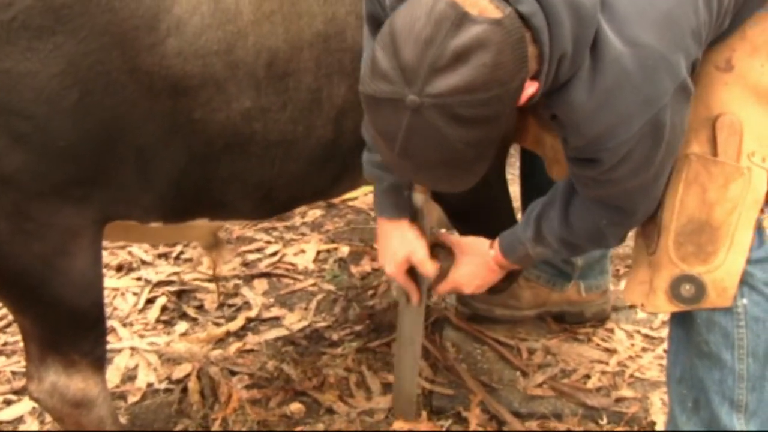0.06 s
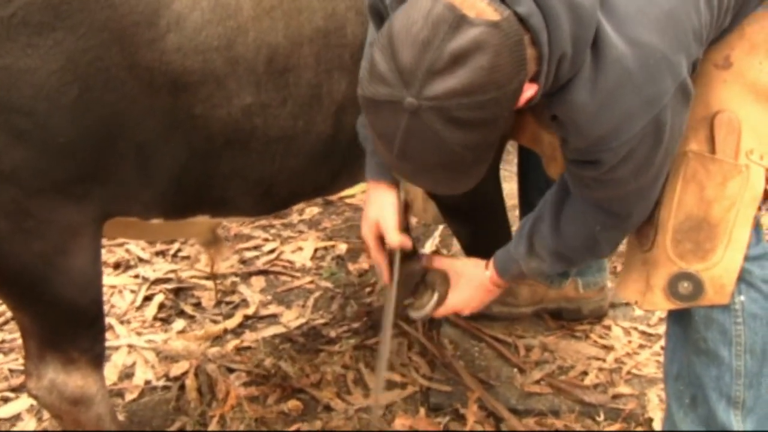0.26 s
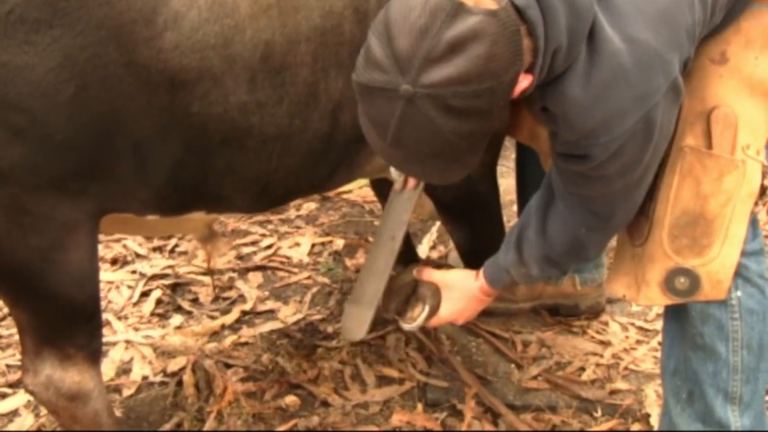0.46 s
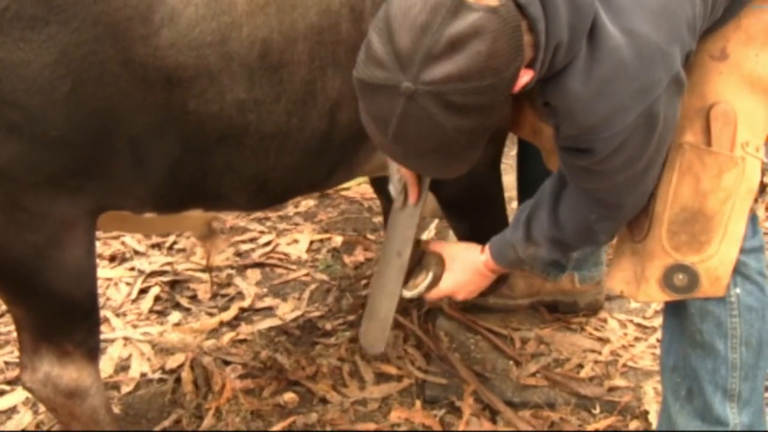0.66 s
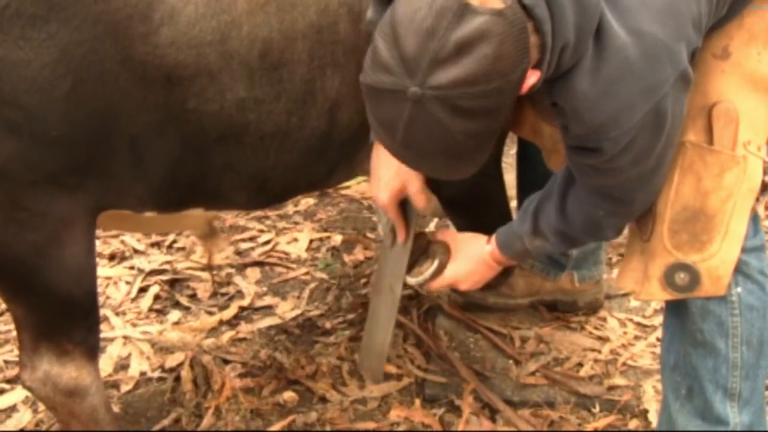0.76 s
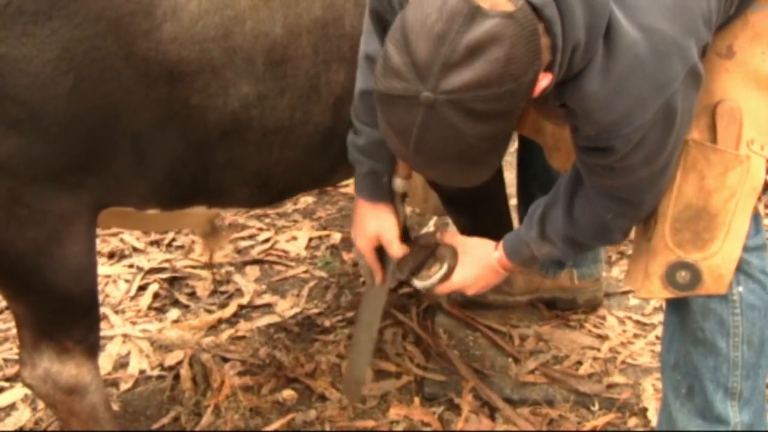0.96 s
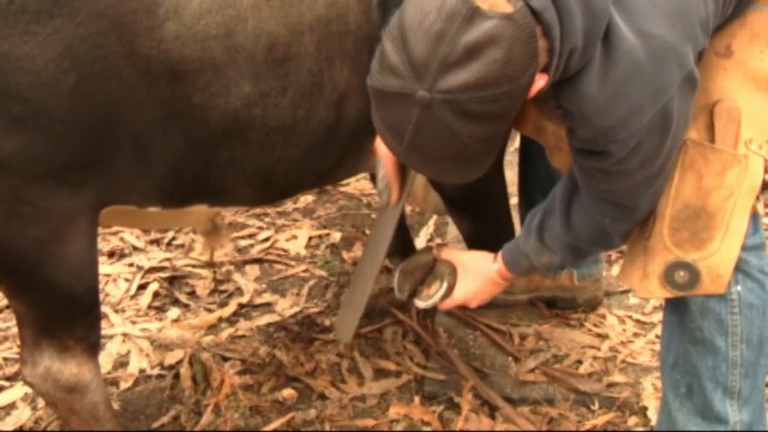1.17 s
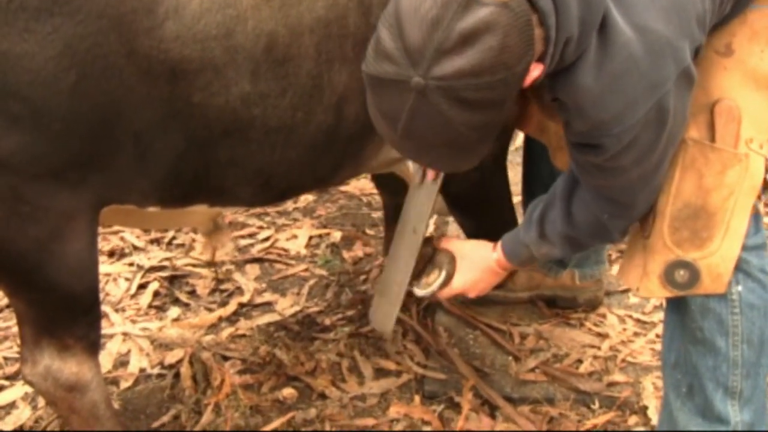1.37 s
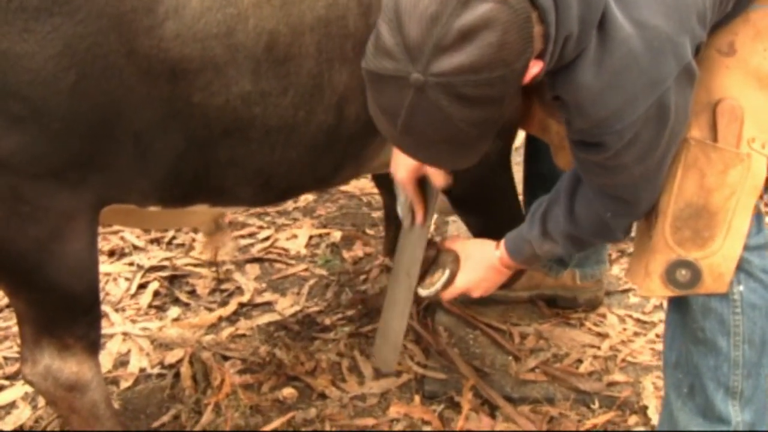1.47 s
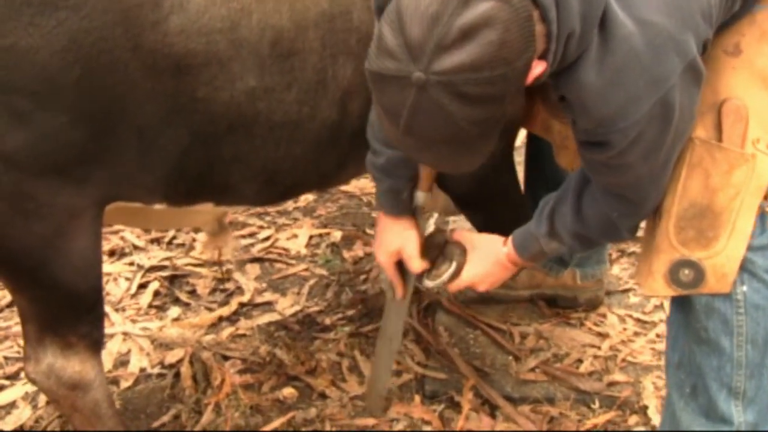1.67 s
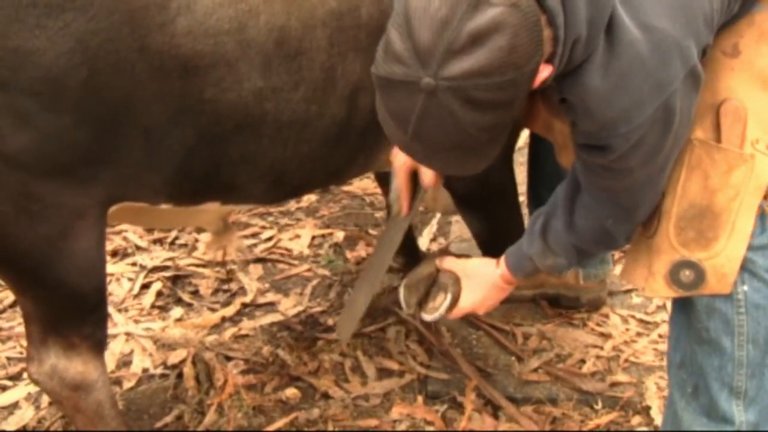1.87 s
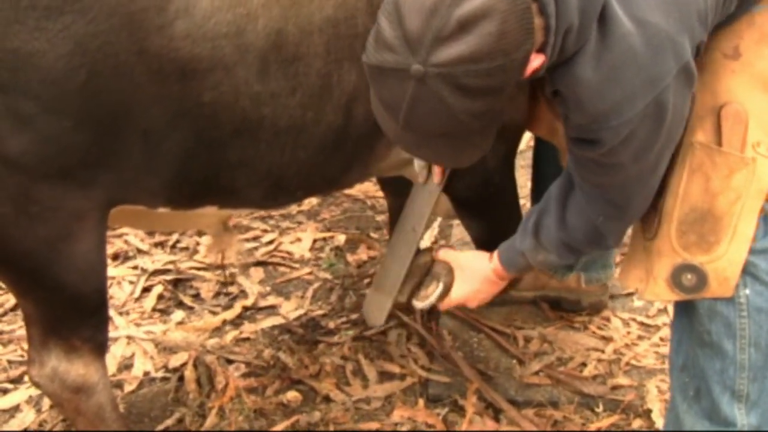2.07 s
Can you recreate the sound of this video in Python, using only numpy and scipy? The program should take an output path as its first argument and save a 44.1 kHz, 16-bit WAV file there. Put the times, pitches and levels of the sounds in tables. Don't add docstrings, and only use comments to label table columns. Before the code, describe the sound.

A steel rasp grinds across a horse's hoof in three separate strokes, thudding in the hoof wall with bright hiss and metallic ring; small taps and litter ticks fall between, close microphone, quiet open air.

```python
import sys
import numpy as np
from scipy import signal
from scipy.fft import rfft, irfft
from scipy.io import wavfile

SR = 44100
rng = np.random.default_rng(int(sys.argv[2]) if len(sys.argv) > 2 else 0)


def level_to_linear(level):
    exponent = np.asarray(level, float) / 20
    return 10 ** exponent


def persist_wave(psi):
    counts = np.round(np.clip(psi, -1, 1) * 32767).astype(np.int16)
    wavfile.write(sys.argv[1], SR, np.atleast_2d(counts).T)


N = 92874


def rms_one(x):
    return x / np.sqrt(np.mean(x ** 2) + 1e-20)


def at_hz(points, hz):
    table_hz, table_db = np.array(points)[:, 0], np.array(points)[:, 1]
    return np.interp(np.log(hz), np.log(table_hz), table_db)


def coloured(x, points):
    hz = np.fft.rfftfreq(N, 1 / SR) + 1
    return irfft(rfft(x) * level_to_linear(at_hz(points, hz)), N)


def high_pass(x, hz, order):
    return signal.sosfilt(signal.butter(order, hz, "high", fs=SR, output="sos"), x)


def drift(rate_hz):
    r = np.exp(-2 * np.pi * rate_hz / SR)
    wander = signal.lfilter([1], [1, -2 * r, r * r], rng.standard_normal(N + SR))
    return rms_one(wander[SR:])


def grains(spread_db):
    return level_to_linear(spread_db * np.minimum(rng.exponential(1, N), 4))


def ring(clicks, hz, width_hz):
    r, w = np.exp(-np.pi * width_hz / SR), 2 * np.pi * hz / SR
    return signal.lfilter([0, np.sin(w)], [1, -2 * r * np.cos(w), r * r], clicks + 1e-18)


def click_at(s):
    return np.arange(N) == int(s * SR)


# start_s, pressure_db (thud level),
# speed_db (hiss level of the sliding), hardness_db_per_octave (of the horn)
STROKES = [
    [(0.0, -18.5, -32.5, -3), (0.034, -34.5, -38.5, 0), (0.044, -38, -39.5, -1.5),
     (0.076, -32.5, -38, -2.5), (0.138, -18, -29.5, -2), (0.212, -49, -51.5, 3), (0.245, -51, -60, 1)],
    [(0.245, -48, -51.5, -2), (0.263, -56, -70, 6), (0.273, -43, -50, 7), (0.283, -40, -57, 0),
     (0.305, -36.5, -42.5, 9), (0.333, -50.5, -57, 4), (0.345, -50, -93, 0)],
    [(0.665, -48, -64, -15), (0.699, -35.5, -38, -21), (0.727, -25.5, -39, -8.5), (0.789, -33.5, -38.5, -3),
     (0.835, -26, -35, -0.5), (0.881, -36, -40, -2.5), (0.965, -20.5, -34.5, 0), (1.01, -57, -57.5, -1)],
    [(1.405, -46, -55, -7), (1.427, -30.5, -44.5, -9.5), (1.469, -21, -38, -5.5), (1.511, -36, -43, -6.5),
     (1.567, -24, -38.5, -2), (1.695, -21, -33, 1), (1.743, -24.5, -41, 0.5), (1.79, -57, -55, 5)],
]


def stroke_control(column):
    t, out = np.arange(N) / SR, np.full(N, -120.)
    for stroke in STROKES:
        s, values = np.array(stroke)[:, 0], np.array(stroke)[:, column]
        inside = (t >= s[0]) & (t < s[-1])
        out[inside] = np.interp(t[inside], s, values)
    return out


def tooth_rows():
    rows_per_s, jitter, spread_db = 430, .35, 2.5
    rate = rows_per_s * np.clip(1 + jitter * drift(150), .2, 3)
    phase = np.cumsum(rate / SR)
    rows = (np.diff(np.floor(phase), prepend=0) > 0) * grains(spread_db)
    grit = 1.51 * rng.standard_normal(N)
    return rms_one(rms_one(rows - rows.mean()) + grit)


# start_s, level_db (peak)
CATCHES = [(0.041, -17), (0.096, -21), (0.106, -42), (0.132, -51), (0.725, -48), (0.813, -22.5),
           (0.833, -37), (0.914, -27), (1.444, -29.5), (1.464, -56), (1.511, -19.5), (1.537, -14),
           (1.558, -17), (1.572, -10.5), (1.588, -23.5), (1.636, -10.5), (1.657, -11), (1.673, -27)]


def chatter(pressure_db):
    skip_s, skip_db, dig_s = .010, -8, .007
    t, skip, dig = np.arange(N) / SR, 0, 0
    for s, db in CATCHES:
        skip = skip + np.clip(1 + (t - s) / skip_s, 0, 1) * (t < s)
        dig = dig + level_to_linear(db) * np.exp(-np.abs(t - s) / dig_s) * (t >= s)
    return level_to_linear(pressure_db + skip_db * skip), dig


# start_s, level_db (peak), crack_db, pitch_hz (favoured), place_0_to_1 (along the bar)
TAPS = [
    (.617, -27, -54.5, 900, .2),
    (1.392, -28, -47.5, 1110, 0.15),
    (2.059, -48, -73, 600, 0.16),
    (2.08, -29, -63, 700, .07),
]


def taps(hz, mode):
    dull_db_per_octave, knock_db = -6, -13
    out = np.zeros(N)
    for s, db, _, centre_hz, place in TAPS:
        octaves_off = abs(np.log2(hz / centre_hz))
        out[int(s * SR)] = level_to_linear(db + dull_db_per_octave * octaves_off) * np.cos(np.pi * mode * place)
    for s, db in CATCHES:
        out[int(s * SR)] = level_to_linear(db + knock_db + 1.2 * rng.standard_normal()) * 1000 / (hz + 1000)
    return out


# pitch_hz, width_hz, level_db
HOOF_MODES = [(381.3, 45.7, -1.5), (458, 29, -1.5), (560, 73, 6.5), (707, 45, -0.5), (787.5, 49.3, 3),
              (990, 63, 3), (1231, 50, 1), (1476, 89, -4.5)]


def hoof(rows, force, hardness_db):
    thud_db, tap_db = -2, -8.5
    size = np.std(sum(level_to_linear(db) * ring(rows, hz, width_hz) for hz, width_hz, db in HOOF_MODES))
    rub = rows / size * force * level_to_linear(thud_db + 0.71 * drift(60))
    wall = 0
    for k, (hz, width_hz, db) in enumerate(HOOF_MODES):
        push = rub * level_to_linear(hardness_db * np.log2(hz / 600))
        push = push + level_to_linear(tap_db) * taps(hz, mode=0)
        wall = wall + (-1) ** k * level_to_linear(db) * ring(push, hz, width_hz)
    return high_pass(wall, 300, order=6)


# pitch_hz, width_hz, level_db
BAR_MODES = [(1810, 45, 1), (2330, 45, 0), (2680, 110, -4), (2970, 55, -5), (3580, 90, -9), (3880, 55, -11),
             (4640, 75, -12), (5400, 110, -12), (6200, 90, -14), (7300, 90, -13), (8400, 170, -10),
             (9300, 150, -10), (11100, 190, -12), (12200, 150, -18)]


def bar(rows, pressure, dig, speed):
    row_share, pressure_share = .7, .15
    ring_db, tilt_db_per_octave, catch_db, tap_db = -8.5, 3, -10, 2.5
    out = 0
    for k, (hz, width_hz, db) in enumerate(BAR_MODES):
        low = np.clip(1 - np.log2(hz / 2500) / 0.76, 0, 1)
        chip_hits = rms_one(rng.standard_normal(N) * grains(2.2))
        source = row_share * low * rows + 0.38 * chip_hits
        by_pressure = low * pressure_share
        drive = pressure ** by_pressure * speed ** (1 - by_pressure)
        drive = drive + level_to_linear(catch_db) * low ** 2 * dig
        drive = drive * level_to_linear(ring_db + tilt_db_per_octave * np.log2(hz / 2500) + 3.02 * drift(6.7))
        drive = drive / np.std(ring(source, hz, width_hz))
        hits = source * drive + level_to_linear(tap_db) * taps(hz, mode=k + 2)
        out = out + (-1) ** k * level_to_linear(db) * ring(hits, hz, width_hz)
    return high_pass(out, 1800, order=4)


# pitch_hz, level_db (per Hz)
CHIP_SPECTRUM = [(1500, 12.5), (2600, -13), (4300, 10), (6000, 5.5), (9000, 9), (12300, -2.5), (13500, -3),
                 (15500, -14)]


def chips(speed):
    cuts_per_s, spread_db, hiss_db, patch_db = 11000, 6, 2.5, 1.4
    cuts = (rng.random(N) < cuts_per_s / SR) * grains(spread_db) * rng.choice([-1, 1], N)
    cuts = rms_one(coloured(cuts, CHIP_SPECTRUM))
    edges_hz = np.geomspace(1500, 16000, num=9)
    hiss = 0
    for low_hz, high_hz in zip(edges_hz, edges_hz[1:]):
        band = signal.sosfilt(signal.butter(2, [low_hz, high_hz], "band", fs=SR, output="sos"), cuts)
        hiss = hiss + band * level_to_linear(patch_db * drift(22))
    return hiss * speed * level_to_linear(hiss_db + 0.4 * drift(44))


def cracks():
    burst = rng.standard_normal(300) * np.exp(-np.arange(300) / SR / .0015)
    clicks = np.zeros(N)
    for s, _, crack_db, *_ in TAPS:
        clicks[int(s * SR)] = level_to_linear(crack_db + 9)
    bright = high_pass(burst, 4500, order=2)
    return coloured(np.convolve(clicks, bright)[:N], CHIP_SPECTRUM)


# start_s, level_db (peak), pitch_hz, t60_s
SHAKES = [
    (.1, -38.5, 180, .12),
    (0.121, -31.5, 299, 0.085),
    (0.198, -45.5, 208, 0.09),
    (.955, -44, 260, 0.079),
    (1.732, -43, 263, 0.074),
]


def shakes():
    knocks = sum(level_to_linear(db) * ring(click_at(s), hz, 1.7 / t60) for s, db, hz, t60 in SHAKES)
    return high_pass(np.convolve(knocks, np.hanning(60) / 30)[:N], 130, order=4)


# start_s, level_db (peak), pitch_hz, t60_s
TICKS = [(0.263, -41, 9050, .003), (.274, -37, 9400, .003), (.322, -27, 4000, 0.005),
         (0.332, -42, 7000, 0.0034), (.523, -23.5, 2870, 0.0028), (0.524, -29.5, 7260, 0.0019),
         (0.533, -56, 7000, .003), (0.55, -24.5, 1820, 0.016), (.548, -28.5, 2130, 0.097),
         (.322, -35, 2840, .008), (1.055, -46, 7500, .003), (1.332, -33, 8350, 0.0011),
         (1.937, -36.5, 1760, 0.0084), (1.966, -50, 10900, .003)]


def ticks():
    clicks = sum(level_to_linear(db) * ring(click_at(s), hz, 4.5 / t60) for s, db, hz, t60 in TICKS)
    return high_pass(clicks, 970, order=2)


# pitch_hz, level_db (per Hz)
AIR_SPECTRUM = [(30, -34), (65, -4), (130, 0.5), (500, -3.5), (2500, -12.5), (6300, -23.5), (10000, -24.5),
                (15500, -32)]
# pitch_hz, side_db (relative to mid)
AIR_SIDE = [(30, -18), (70, -31), (170, -14.5), (400, -14), (4000, -18.5), (9000, -15), (13000, -7)]


def air():
    mid = coloured(rng.standard_normal(N), AIR_SPECTRUM)
    side = coloured(coloured(rng.standard_normal(N), AIR_SPECTRUM), AIR_SIDE)
    level = level_to_linear(-51 + .8 * drift(2.5)) / np.std(mid)
    return level * (mid + side * [[1], [-1]])


# pitch_hz, side_db (relative to the work)
WORK_SIDE = [(300, -38), (1000, -45.5), (3000, -38), (9000, -31), (13000, -16)]


def scene():
    catch_thud_db, catch_hiss_db = -6, -22
    echo_s, echo_db = .0045, -12.5
    pressure, dig = chatter(stroke_control(column=1))
    speed = level_to_linear(stroke_control(column=2))
    hardness_db = np.clip(stroke_control(column=3), -9, 9)
    rows = tooth_rows()
    work = hoof(rows, pressure + level_to_linear(catch_thud_db) * dig, hardness_db)
    work = work + bar(rows, pressure, dig, speed)
    work = work + chips(speed + level_to_linear(catch_hiss_db) * dig)
    work = work + cracks() + shakes() + ticks()
    echo = np.interp(np.arange(N) - echo_s * SR, np.arange(N), work, left=0)
    side = coloured(echo, WORK_SIDE) * [[1], [-1]]
    return work + level_to_linear(echo_db) * echo + side + air()


def roll_off(x):
    return signal.sosfilt(signal.butter(12, 15760, fs=SR, output="sos"), x)


# pitch_hz, level_db
MIC_DIP = [(12200, 0), (12900, -9), (13500, -1), (15000, -2)]


def record(dry):
    mix = np.array([coloured(x, MIC_DIP) for x in dry])
    return roll_off(mix)


dry = scene()
out = record(dry)
persist_wave(out)
```